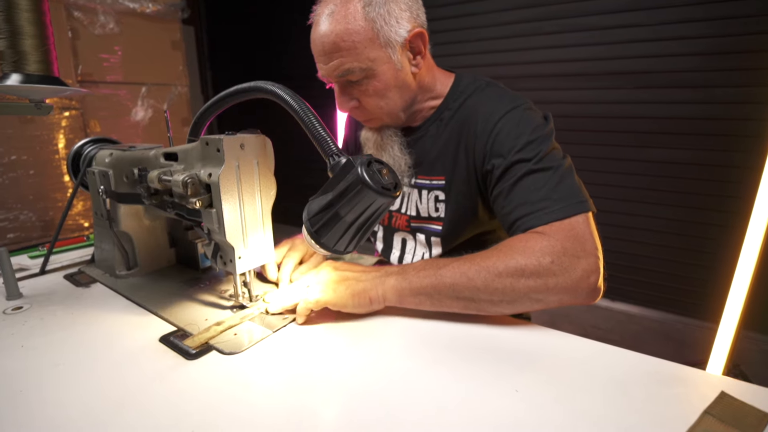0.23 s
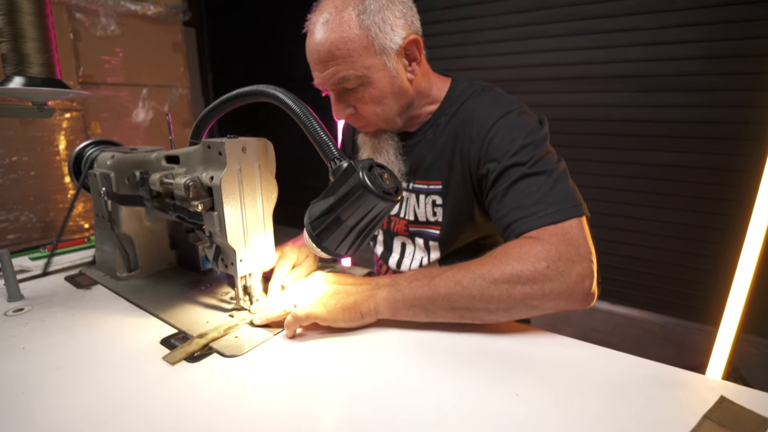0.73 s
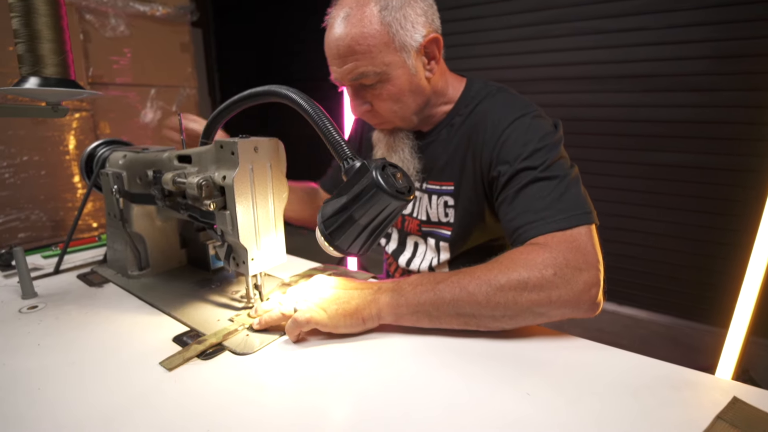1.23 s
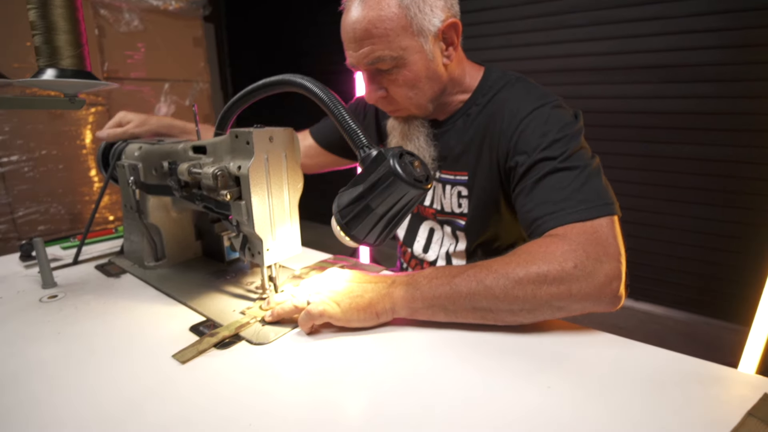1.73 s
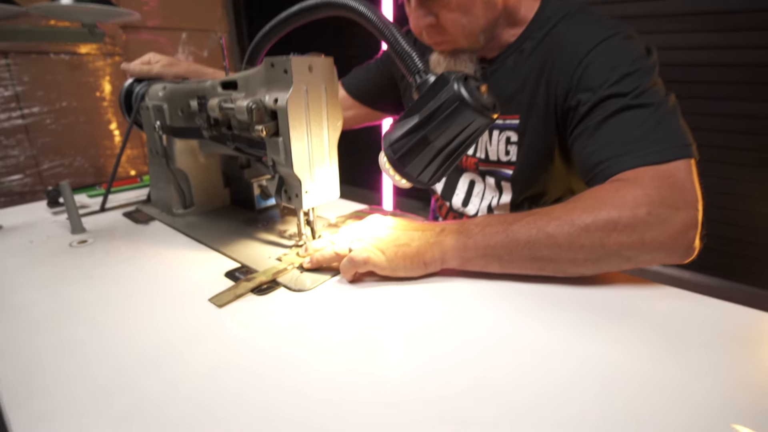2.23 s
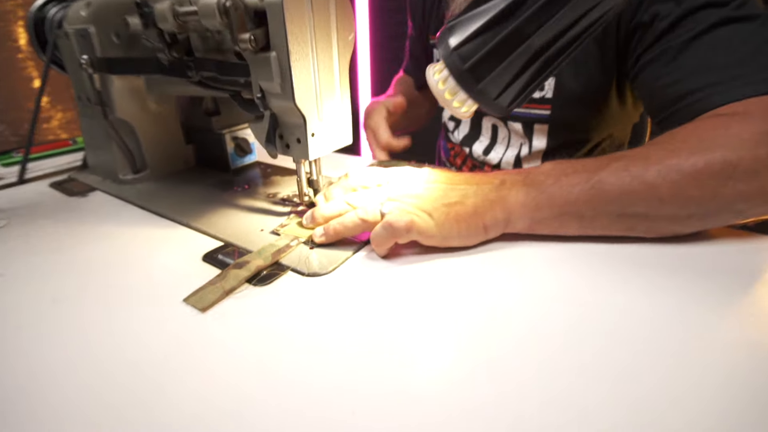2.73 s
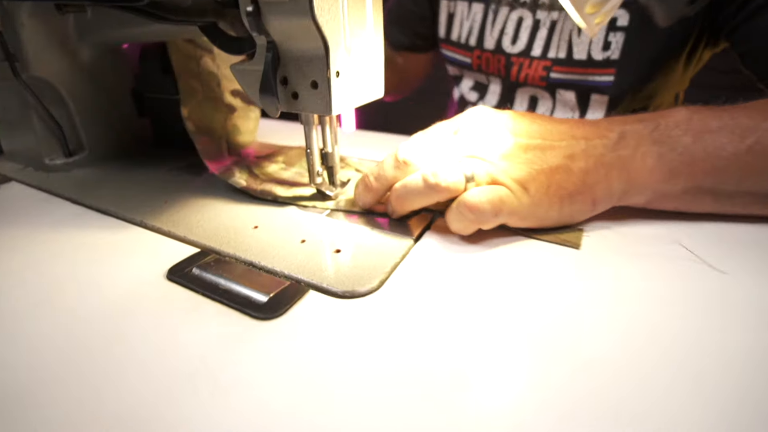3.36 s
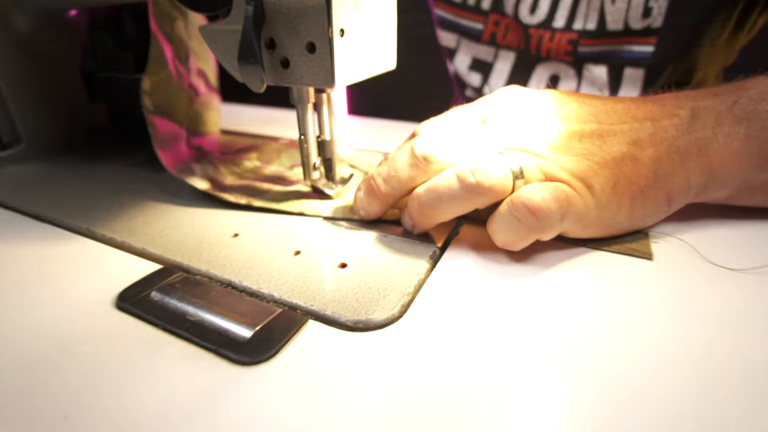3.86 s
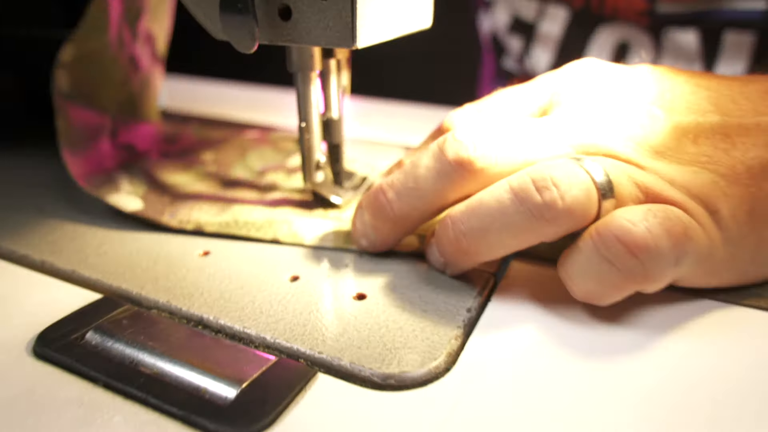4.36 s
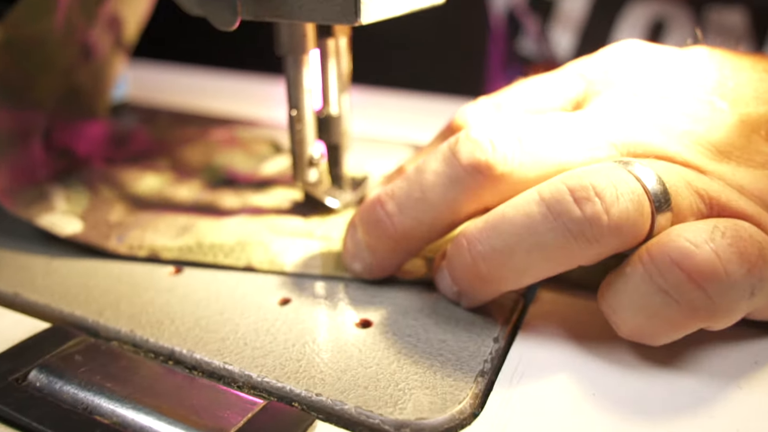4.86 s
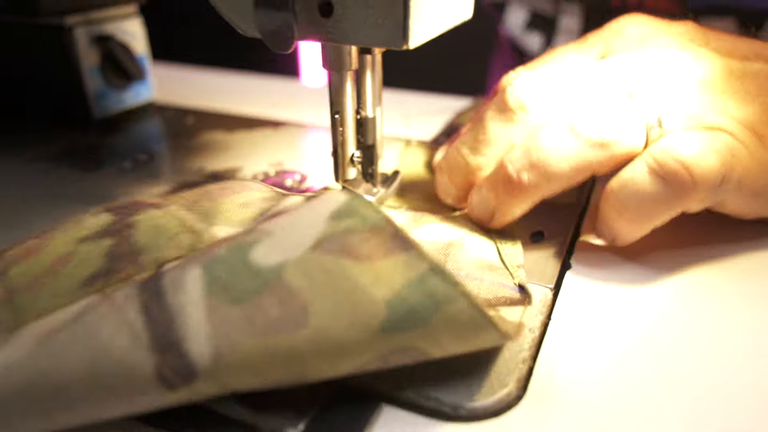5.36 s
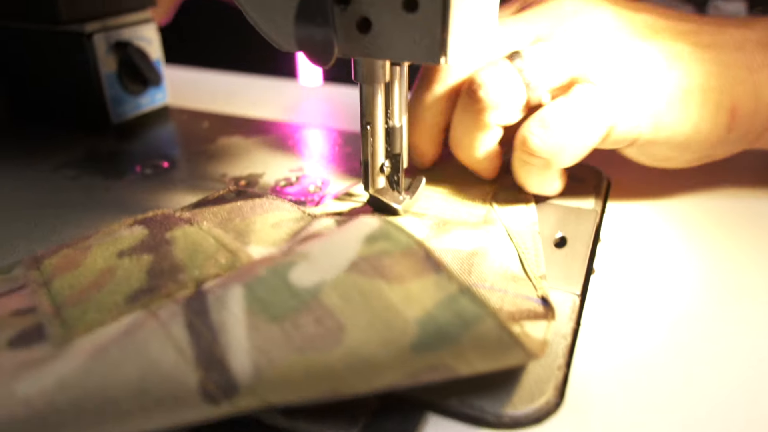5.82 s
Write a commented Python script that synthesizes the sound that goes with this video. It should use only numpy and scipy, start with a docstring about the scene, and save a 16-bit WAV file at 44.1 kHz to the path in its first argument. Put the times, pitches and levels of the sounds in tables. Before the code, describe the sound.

Two bursts of rapid mechanical stitching, steel clacks and table thumps over whirring gears, separated and followed by stiff fabric rustles and lever clicks.

```python
"""First a burst of stitches from a heavy sewing machine, close to the microphone on a table in a small workshop.
Each shaft turn snaps steel parts, knocks the cast arm and thumps the table over whirring gears:
decaying modes and noise cracks over coloured grit, all following shaft speed or set moment by moment.
Then hands slide stiff cloth (crackling noise) and touch levers (short rings), until a second burst.
More handling follows; shop air, a steady low-heavy noise, hums behind it all."""
import sys
import numpy as np
from scipy import signal
from scipy.fft import rfft, irfft, next_fast_len
from scipy.io import wavfile
from scipy.ndimage import map_coordinates

SR = 44100
rng = np.random.default_rng(int(sys.argv[2]) if len(sys.argv) > 2 else 0)


def put_to_file(sound):
    """Save the sound as 16-bit audio at rate SR, in the file named by the first command-line argument."""
    columns = np.atleast_2d(sound).T  # one column per channel
    safe = np.clip(columns, -1, 1)
    whole_steps = np.round(safe * 32767)
    wavfile.write(sys.argv[1], SR, whole_steps.astype(np.int16))


N = 268569


def amp(db):
    """Gain of a level in dB."""
    return 10 ** (np.asarray(db) / 20)


def unit(x):
    """x at rms 1."""
    return x / np.sqrt(np.mean(x ** 2) + 1e-20)


def along(points, hz):
    """(frequency [Hz], value) points read on a log frequency axis."""
    f, v = np.transpose(points)
    return np.interp(np.log(hz + 1), np.log(f + 1), v)


def wobble(rate):
    """A smooth random curve, rate knots a second."""
    knots = rng.standard_normal(int(N * rate / SR) + 4)
    return map_coordinates(knots, [np.arange(N) * rate / SR])


def colour(x, spectrum):
    """x shaped by (frequency [Hz], level [dB]) points, at rms 1."""
    m = next_fast_len(N + 8192)
    gain = amp(along(spectrum, np.fft.rfftfreq(m, 1 / SR)))
    return unit(irfft(rfft(x, m) * gain, m)[:N])


def grit(rate, spread_db, life, share):
    """Noise with a share of tiny random contacts, each a burst that decays with time constant life [s]."""
    strengths = amp(spread_db * np.clip(rng.standard_normal(N), -2, 2))
    hits = (rng.random(N) < rate / SR) * strengths
    bursts = signal.lfilter([1], [1, -np.exp(-1 / (life * SR))], hits)
    share = np.clip(share, 0, 1)
    envelope = np.sqrt(share) * unit(bursts) + np.sqrt(1 - share)
    return envelope * rng.standard_normal(N)


def ring(modes, t, scatter_db):
    """One blow on a set of decaying modes, at new strengths and slightly new pitches, peak 1."""
    draw = rng.standard_normal((len(modes), 2))
    x = 0
    for (hz, db, t60), (strength, detune) in zip(modes, draw):
        decay = amp(db + scatter_db * strength - 60 * t / t60)
        x = x + decay * np.sin(2 * np.pi * hz * (1 + 0.034 * detune) * t)
    return x / np.abs(x).max()


def favour(modes, pitch, fall_db):
    """Modes as a blow near one pitch excites them: fall_db weaker for each octave away."""
    return [(hz, db - fall_db * abs(np.log2(hz / pitch)), t60) for hz, db, t60 in modes]


def crack(t, lo_hz, hi_hz, t60):
    """A dying burst of band noise, peak 1."""
    band = signal.butter(2, [lo_hz, hi_hz], "bandpass", fs=SR, output="sos")
    x = signal.sosfilt(band, rng.standard_normal(len(t)) * amp(-60 * t / t60))
    return x / np.abs(x).max()


def add(track, s, x):
    """Mix x into track at s seconds."""
    part = track[round(s * SR):][:len(x)]
    part += x[:len(part)]


# Background air of the workshop: (frequency [Hz], relative level [dB per Hz])
AIR_SPECTRUM = [(15, -11), (35, -14.5), (55, 2), (80, -7.5), (120, 1.5), (300, -3), (450, -4), (700, -14),
                (1200, -18), (2000, -27.5), (3200, -28.5), (3800, -26.5), (4600, -32.5), (5500, -40),
                (16000, -56)]
AIR_DB, AIR_DRIFT_DB = -44.5, 1.3
JOLT_AT_S, JOLT_DB, JOLT_LENGTH_S = 2.98, -41.5, 0.1


def air():
    """Low-heavy noise for shop rumble that drifts a little, and a low jolt of the microphone."""
    rumble = amp(AIR_DB + AIR_DRIFT_DB * wobble(7)) * colour(rng.standard_normal(N), AIR_SPECTRUM)
    shake = colour(rng.standard_normal(N), [(10, -17), (22, 6.5), (35, -11.0), (60, -46.5)])
    swell = np.exp(-((np.arange(N) / SR - JOLT_AT_S) / JOLT_LENGTH_S) ** 2)
    return rumble + shake * amp(JOLT_DB) * swell


# Decay of the small workshop: (frequency [Hz], t60 [s])
ROOM_DECAY = [(200, 0.83), (2000, 0.44), (10000, 0.14)]


def shop(x):
    """The room answers with a noise tail in which each frequency dies at its own speed."""
    hz, t, z = signal.stft(rng.standard_normal(SR // 2), SR, nperseg=256)
    decay = amp(-60 * t / along(ROOM_DECAY, hz)[:, None])
    tail = signal.istft(z * decay, SR, nperseg=256)[1]
    delayed = np.pad(x, (300, 0))  # samples before the room answers
    return signal.fftconvolve(delayed, tail / np.linalg.norm(tail))[:N]


# Thin squeaks: (start [s], length [s], first pitch [Hz], last pitch [Hz], level before wavering [dB])
SQUEAKS = [(2.005, .035, 4270, 4080, -59), (2.078, .045, 3480, 3880, -55), (2.312, .05, 4080, 4110, -58)]


def squeaks():
    """Short sine whistles that glide a little while pitch and level waver."""
    out = np.zeros(N)
    for s, length, first_hz, last_hz, db in SQUEAKS:
        u = np.arange(round(length * SR)) / (length * SR)
        glide = first_hz + (last_hz - first_hz) * u
        pitch = glide * (1 + 0.05 * wobble(396)[:len(u)])
        level = amp(db + 4 * wobble(210)[:len(u)]) * np.sqrt(np.sin(np.pi * u))
        add(out, s, level * np.sin(2 * np.pi * np.cumsum(pitch) / SR))
    return out


# Fingers, levers and thread tap on the bed:
# (time [s], relative body level [dB], pitch [Hz], relative treble level [dB])
BED_TAPS = [(1.606, -39, 2001, -62.5), (1.753, -34.5, 3900, -44), (2.2846, -40.5, 1860, -66),
            (2.3157, -33, 1890, -65), (2.3447, -39, 2100, -56), (2.3645, -45, 3340, -71),
            (2.406, -23.5, 3210, -49.5), (2.5017, -39, 3580, -46.5), (2.5132, -38, 1960, -60),
            (2.64, -40.5, 1180, -74), (2.7268, -23.5, 3660, -43.5), (2.827, -39, 2700, -64),
            (2.92, -46, 4050, -36), (3.0055, -29, 3880, -35), (3.3705, -35.5, 2030, -68.5),
            (3.565, -34, 1820, -70.5), (4.996, -38.5, 4390, -62), (5.032, -56, 4000, -51),
            (5.044, -55, 4000, -49), (5.065, -40, 3980, -42), (5.127, -46, 4000, -37.5),
            (5.376, -44, 4000, -50), (5.2564, -44, 3100, -36.5), (5.2727, -30.5, 1480, -45),
            (5.493, -47, 1400, -41.5), (5.6494, -30.5, 1560, -55), (5.666, -34, 3720, -43),
            (5.8148, -40, 1520, -69.5), (5.846, -36.5, 1450, -71.5), (5.857, -38, 1450, -73.5),
            (5.896, -41, 2800, -55), (5.9289, -31.5, 2240, -60.5), (5.937, -30, 2800, -39),
            (6.0105, -37, 3380, -55.5), (6.022, -36, 3450, -50.5)]


def taps():
    """Each tap is a dry noise clack with three fast-dying modes around its own pitch."""
    out, t = np.zeros(N), np.arange(SR // 10) / SR
    for s, db, hz, top_db in BED_TAPS:
        modes = [(hz, 0, 40 / hz), (hz * 1.7, -10, 30 / hz), (hz * .55, -6, 25 / hz)]
        body = 1.1 * ring(modes, t, 3) + 0.52 * crack(t, 560, 3700, 0.033)
        treble = crack(t, 3600, 19000, 0.013)
        add(out, s, amp(db) * body + amp(top_db + 6) * treble)
    return out


# Strokes of cloth under the hands:
# (strongest moment [s], rustle level [dB], rise [s], fall [s], crackle level [dB])
STROKES = [(1.92, -57, 0.14, 0.16, -89), (2.41, -54.5, 0.13, 0.13, -74.5),
           (2.715, -50.5, 0.021, 0.015, -47.5), (2.96, -46.5, 0.15, 0.16, -52), (3.26, -57, .12, 0.13, -71),
           (5.07, -58.5, 0.055, 0.072, -58), (5.19, -44.5, 0.064, 0.053, -58),
           (5.25, -43, .06, 0.071, -47.5), (5.331, -49, 0.078, 0.067, -70),
           (5.92, -58.5, 0.086, 0.055, -71), (6.04, -63, 0.15, 0.22, -70.5)]
# The cloth is tugged free: (start [s], length [s], level [dB])
TUGS = [(3.069, 0.02, -40), (5.083, 0.016, -30.5), (5.226, 0.013, -47)]
# Rustle of the weave: (frequency [Hz], relative level [dB per Hz])
WEAVE_SPECTRUM = [(410, 0), (700, 7.5), (910, 7.5), (1230, 0), (1440, 8), (1980, 0.5), (2230, 6.5),
                  (3770, 11), (11700, -5), (14000, 0.5), (16200, -20.5)]
STROKE_FADE_DB = 22.5  # lost over one rise or fall


def cloth():
    """Stiff cloth rustles and crackles as gritty noise when it slides, and rips free in short flat bursts."""
    t = np.arange(N) / SR
    rips = sum(amp(db) / (1 + (2 * (t - s) / length - 1) ** 8) for s, length, db in TUGS)
    pull, snap = np.zeros(N), np.zeros(N)
    for s, db, rise, fall, crackle_db in STROKES:
        distance = np.abs((t - s) / np.where(t < s, rise, fall))
        stroke = amp(-STROKE_FADE_DB * distance ** 1.55)
        pull += amp(db) * stroke
        snap += amp(crackle_db) * stroke
    crackle_spectrum = [(3000, -31.5), (8000, 0.5), (11000, -3.5), (15500, 1), (16400, -17.0)]
    crackle = colour(grit(220, 6.5, .001, 0.85), crackle_spectrum)
    rustle = colour(grit(220, 6.0, 0.0014, 0.57), WEAVE_SPECTRUM)
    ripping = colour(grit(1600, 2, 0.0018, 0.4), WEAVE_SPECTRUM)
    return pull * rustle + snap * crackle + rips * ripping


def hands():
    """Handling sounds together: sliding cloth, taps on the bed and thin squeaks."""
    return cloth() + taps() + squeaks()


# Two bursts of stitches, one row a turn of the shaft, the last row closing the burst:
# (needle down [s], click [dB], weight [dB], mid-turn blow [share of turn], that blow on the arm [dB]);
# the levels are added to those of the contacts in a turn
STITCH_RUNS = [
    [(.05, -6, -1, .5, -2.5), (.18, -7, 2, 0.4, -12), (.3045, 3.5, 9, 0.27, -3.5),
     (.3848, 6, 4.5, 0.41, -5), (.4430, 12, -1, .45, -7), (.4973, 8.5, 0.5, .41, -4.5),
     (.5512, 0.5, 4, .41, -6), (.6085, 3, -3, 0.45, -6), (.67, -9.5, -3, .46, 6), (.7377, 2, 0.5, .45, 6.5),
     (.8125, -0.5, 2, .46, 4.5), (.9008, -4.5, -2, 0.52, 4), (.9951, 8.5, 1, .47, 5.5),
     (1.0935, 1.5, -11, .45, 6.5), (1.2, -2, -5.5, .43, 3), (1.3214, 0.5, 4, .445, 5),
     (1.4546, 4, 3, .475, 5), (1.604, 0, 0, 0, 0)],
    [(3.575, 3, -6, .47, -4), (3.7624, 3, 0, .47, 5.5), (3.8772, 2, 0, .445, 4.5), (3.9894, 3, -3, .44, 0),
     (4.102, 3, 2.5, .445, 5), (4.214, -1, 0.5, 0.49, 4), (4.325, -8, -4, .455, 6.5),
     (4.443, 2.5, -3.5, .45, 6), (4.562, 0.5, 1.5, .465, 1), (4.688, -15.5, -7.5, .47, -9),
     (4.8, 0, 0, 0, -4)],
]
# Presses of the pedal, a light one before each full one; base levels hold at ten turns a second:
# (clutch fully in [s], run-up [s], let go [s], run-down [s], middle [dB], treble [dB], bass [dB])
PEDAL_PRESSES = [(0.161, 0.11, 0.16, 0.29, -44, -54, -39.5), (.305, 0.044, 1.496, 0.086, -42, -51.5, -39.5),
                 (3.69, 0.072, 3.74, 0.28, -41, -52, -30.5), (3.744, 0.059, 4.7, 0.015, -36, -48, -34)]
# Gain for each doubling of speed: (middle [dB], treble [dB], bass [dB])
SPEED_GAIN_DB = (7.5, 9, 7)
RAMP_DB = 19.5  # lost over one run-up or run-down


def drive():
    """Middle, treble and bass level in dB: they follow shaft speed, rise with the clutch and fall on release."""
    t, level = np.arange(N) / SR, np.full((3, N), -150.)
    downs = [np.transpose(rows)[0] for rows in STITCH_RUNS]
    middles = np.concatenate([(s[1:] + s[:-1]) / 2 for s in downs])
    turns = np.concatenate([np.diff(s) for s in downs])
    octaves = np.interp(t, middles, np.log2(1 / turns / 10))  # over ten turns a second
    for full, up, brake, down, *base_db in PEDAL_PRESSES:
        before = np.clip((full - t) / up, 0, None)
        after = np.clip((t - brake) / down, 0, None)
        ramp_db = RAMP_DB * (before ** 2 + after ** 2)
        level = np.maximum(level, np.outer(SPEED_GAIN_DB, octaves) + np.c_[base_db] - ramp_db)
    return level


def rattle(modes, rate):
    """Loose links touch at random; each contact pings one mode, a two-pole resonator."""
    out = np.zeros(N)
    for hz, db, t60 in modes:
        hits = (rng.random(N) < rate / SR) * rng.standard_normal(N)
        pole = amp(-60 / (t60 * SR))
        resonator = [1, -2 * pole * np.cos(2 * np.pi * hz / SR), pole ** 2]
        out = out + amp(db) * unit(signal.lfilter([1], resonator, hits))
    return unit(out)


# How the gear noise swells over one turn: (share of turn, treble [dB], middle [dB], bass [dB])
TURN_SWELL = [(0, 4.5, -2.5, -5.5), (.06, -5.5, 5, 1.5), (.12, 8.5, 4, 2), (.18, 1.5, -5.5, 1),
              (.26, 4.5, 1.5, -2), (.39, 3.5, -3, -4.5), (.5, 2, 2, 0), (.62, 4, 2, -4), (.74, 2, -3, -10),
              (.87, 6.5, 5, 1)]
# Middle, treble and bass of the gears: (frequency [Hz], relative level [dB per Hz])
WHIRR_SPECTRUM = [(710, 4.5), (1200, -0.5), (1580, 0), (2280, 4.5), (2560, 2), (3140, 8.5), (4160, 7.5),
                  (5370, -12), (6500, -11.5), (8450, -43.5), (14300, -120)]
SIZZLE_SPECTRUM = [(2940, -26), (5000, -4), (5380, -1), (5820, 6.5), (7160, 0), (9710, 3), (10700, -5.5),
                   (12300, -1), (15000, 3), (15800, -15.5), (16200, -84.5)]
DRONE_SPECTRUM = [(29, -80.5), (55, -40), (85, -10), (113, 6.5), (168, -1), (217, 6.5), (531, -1.5),
                  (716, -8.5), (925, -1), (1420, -9.5), (1500, -4.5), (1950, -7), (3300, -120)]
# Modes of the steel links, then of the small pins: (frequency [Hz], relative level [dB], t60 [s])
STEEL_MODES = [(2020, -4, .025), (2220, -2, .025), (2570, -1, .025), (2800, -2, .02), (3200, 0, .02),
               (3540, 0, .02), (4150, -4, .02), (4700, -3, .025)]
PIN_MODES = [(5900, -21.5, 0.015), (8020, 5.5, 0.023), (9030, 8.5, 0.021), (9700, -5, 0.012),
             (13800, 4.5, 0.012), (15300, -15.5, 0.011)]


def gears():
    """Meshing and sliding parts hiss in three bands of noise, swelling at fixed points of each turn."""
    downs = np.concatenate(STITCH_RUNS)[:, 0]
    turn = np.interp(np.arange(N) / SR, downs, np.arange(len(downs))) % 1
    share, *cams = np.transpose(TURN_SWELL)
    treble, middle, bass = (amp(np.interp(turn, share, cam, period=1)) for cam in cams)
    mid_gain, top_gain, low_gain = amp(drive())
    whirr = colour(grit(350, 0.91, 0.0022, 0.41), WHIRR_SPECTRUM) + amp(-4.0) * rattle(STEEL_MODES, 90)
    sizzle = colour(grit(300, 1.4, 0.00151, 0.63), SIZZLE_SPECTRUM) + amp(-6.0) * rattle(PIN_MODES, 77)
    drone = amp(2.8 * wobble(30)) * colour(rng.standard_normal(N), DRONE_SPECTRUM)
    return mid_gain * middle * whirr + top_gain * treble * sizzle + low_gain * bass * drone


# Contacts of one turn, the first burst heard from the arm's side, the second next to the needle.
# Rows: needle down, its links, feed lift, mid-turn (share added to the stitch's own), take-up.
# Levels are over the gears' middle level; the needle-down table pitch holds at ten turns a second:
# (share of turn, pins [dB], links [dB], arm [dB], favoured arm pitch [Hz], table [dB], table pitch [Hz])
TURN_CONTACTS = [
    [(0, 17, 2.5, -5, 1000, 5, 125), (0.05, -3, 4.5, 10, 900, 5, 440), (.22, -5.5, 0.5, -12, 799, 1, 290),
     (.0, 6, 9, 19.5, 760, 9, 325), (0.76, -6, 7, -14.5, 730, -2, 220)],
    [(0, 17, 0, -10, 900, 14.5, 126), (0.014, 6, 14, 17, 1020, 10.5, 174),
     (.22, -2.5, -1, -20, 700, 8.5, 130), (0.026, 15, 11.5, 15, 690, 9.5, 220),
     (.87, 17.5, 8.5, 4, 920, 1.5, 330)],
]
SCATTER_DB = 1.5  # from contact to contact
ARM_PITCH_SCATTER, TABLE_PITCH_SCATTER = .05, .07  # spread as log ratio
PUSH_RISE = 1.02  # power of shaft speed that the needle-down table pitch follows


def contacts():
    """Rows (s, pins dB, links dB, arm dB, arm Hz, table dB, table Hz) of every contact in every turn."""
    level, out = drive()[0], []
    for rows, turn in zip(STITCH_RUNS, TURN_CONTACTS):
        for (s, click_db, weight_db, mid, knock_db), (after, *_) in zip(rows, rows[1:]):
            quick = (.1 / (after - s)) ** PUSH_RISE
            # later by share of turn, table pitch factor, then added dB on pins, links, arm, table
            own = [(0, quick, click_db, weight_db, 0, weight_db),
                   (0, 1, 0, weight_db, weight_db, 0),
                   (0, 1, 0, 0, 0, 0),
                   (mid, 1, 0, 0, knock_db, 0),
                   (0, 1, 0, 0, 0, 0)]
            for contact, (late, rise, *extra) in zip(turn, own):
                share, pins, links, arm, arm_hz, table, table_hz = contact
                when = s + (share + late) * (after - s)
                draw = rng.standard_normal(6)
                db = level[round(when * SR)] + SCATTER_DB * draw[:4] + [pins, links, arm, table] + extra
                arm_bend = np.exp(ARM_PITCH_SCATTER * draw[4])
                table_bend = np.exp(TABLE_PITCH_SCATTER * draw[5])
                out.append((when, db[0], db[1], db[2], arm_hz * arm_bend, db[3], table_hz * rise * table_bend))
    return np.array(out)


LINK_HZ = 3120  # snaps without a pitch of their own favour the middle of the steel
SNAP_DELAY_S = .0006  # a snap starts this long after its listed time


def snaps(rows):
    """A sharp noise crack with ringing pins, and a softer, longer ring of steel links near a favoured pitch."""
    out, t = np.zeros(N), np.arange(SR // 20) / SR
    for s, top_db, mid_db, *favoured in rows:
        pitch, fall_db, ringing = (favoured[0], 30, 1.1) if favoured else (LINK_HZ, 3, .5)
        struck = favour(STEEL_MODES, pitch, fall_db)
        bright = 0.94 * crack(t, 4800, 15500, 0.0029) + 0.43 * crack(t, 13000, 16500, 0.0065)
        bright += 0.52 * crack(t, 6600, 13000, 0.015) + 0.482 * ring(PIN_MODES, t, 3.3)
        links = 0.51 * crack(t, 1200, 7200, 0.0069) + 0.35 * crack(t, 2000, 5040, 0.04)
        links += ringing * ring(struck, t, 4)
        soft_start = 1 - np.exp(-t / 0.00059)
        add(out, s + SNAP_DELAY_S, amp(top_db - 4.5) * bright + amp(mid_db + 11.5) * soft_start * links)
    return out


# Modes of the cast arm: (frequency [Hz], relative level [dB], t60 [s])
ARM_MODES = [(438, 5.5, 0.15), (604.4, 6.5, 0.059), (722, 4.5, 0.043), (837.5, -8.5, 0.18), (968, 3, 0.044),
             (1055, 1, 0.042), (1564, -5.5, .03)]
ARM_SCATTER_DB = 1.8  # from mode to mode


def arm_knocks(blows):
    """The cast arm rings most at the modes near the blow's pitch and shakes the links, a noise crack."""
    out, t = np.zeros(N), np.arange(SR // 6) / SR
    for s, db, pitch in blows:
        struck = favour(ARM_MODES, pitch, 19)
        body = 1.18 * ring(struck, t, ARM_SCATTER_DB) + 0.17 * crack(t, 1200, 3200, 0.025)
        add(out, s, amp(db) * (1 - np.exp(-t / 0.0007)) * body)
    return out


def table_thumps(pushes):
    """The table top answers a push with a short soft swell of a cosine."""
    out, t = np.zeros(N), np.arange(SR // 6) / SR
    for s, db, hz in pushes:
        swell = np.exp(-((t - .011) / np.where(t < .011, .005, .01)) ** 2)
        wave = swell * np.cos(2 * np.pi * hz * (t - .011))
        swing_back = swell * wave.sum() / swell.sum()  # leaves no net push
        add(out, s, amp(db) * (wave - swing_back))
    return out


# Steel parts clack with a ring near one pitch:
# (time [s], relative treble level [dB], relative middle level [dB], favoured pitch [Hz])
PITCHED_CLACKS = [(0.832, -22, -33.5, 3720), (0.9243, -27, -34.5, 4580), (1.0151, -27, -31, 3150),
                  (1.1144, -24.5, -28, 4160), (1.2186, -27, -35, 3670), (1.2915, -37, -37, 4005),
                  (1.3543, -39, -36, 4160), (1.4301, -35, -37.5, 4180), (3.638, -46, -39.5, 2700),
                  (3.6586, -33, -38, 3980), (3.6955, -39, -37, 3100), (3.7404, -20.5, -29, 3110),
                  (3.9005, -21, -26, 4730), (4.0133, -28, -34, 4790), (4.0352, -19.5, -34, 2580),
                  (4.124, -18.5, -33, 3110), (4.2443, -16, -34, 3070), (4.354, -14.5, -27, 4430),
                  (4.4697, -19.5, -31, 4390), (4.585, -20, -29, 4020), (4.6947, -34, -36, 3320)]
# Clutch and brake parts snap on their own: (time [s], relative treble level [dB], relative middle level [dB])
CLUTCH_SNAPS = [(0.052, -42, -39.5), (.155, -30, -35), (.237, -25, -45), (1.6049, -38.5, -38.5),
                (4.7328, -45, -41), (4.776, -33, -38.5)]
# The foot lever and hands knock the cast arm: (time [s], relative level [dB], favoured pitch [Hz])
LEVER_KNOCKS = [(2.402, -26.5, 670), (2.726, -26.5, 880), (3.671, -27.5, 534), (4.697, -39, 513),
                (5.629, -15, 1080), (5.633, -26, 564), (5.65, -25.5, 540), (5.698, -23.5, 830),
                (5.712, -37, 453), (5.812, -30, 900), (5.838, -26, 940), (5.844, -31.5, 434)]
# Hands and pedal push the table top: (time [s], relative level [dB], pitch [Hz])
TABLE_PUSHES = [(0.178, -30, 108), (0.301, -24.5, 128), (4.912, -34, 312), (5.033, -34, 304),
                (5.047, -31.5, 328), (5.709, -31, 299), (5.838, -32.5, 272)]


def machine():
    """Gears, and each contact heard in steel, arm and table."""
    rows = contacts()
    steel = snaps([*rows[:, :3], *PITCHED_CLACKS, *CLUTCH_SNAPS])
    arm = arm_knocks([*rows[:, [0, 3, 4]], *LEVER_KNOCKS])
    table = table_thumps([*rows[:, [0, 5, 6]], *TABLE_PUSHES])
    return gears() + steel + arm + table


def scene():
    """Machine and hands close by with their room, over the shop air."""
    near = machine() + hands()
    return (near + amp(-16.0) * shop(near) + air())[None]


TOP_HZ = 16700


def record(dry):
    """The microphone keeps nothing from its band limit up."""
    m = next_fast_len(N + 8192)
    in_band = np.fft.rfftfreq(m, 1 / SR) < TOP_HZ
    return irfft(rfft(dry, m) * in_band, m)[:, :N]


dry = scene()
out = record(dry)
put_to_file(out)
```